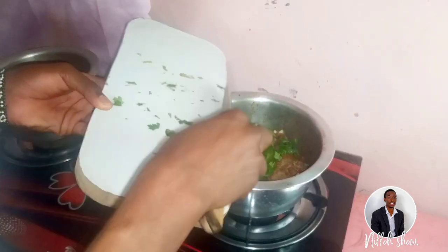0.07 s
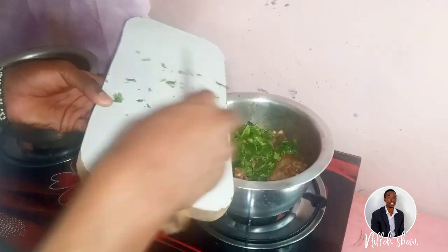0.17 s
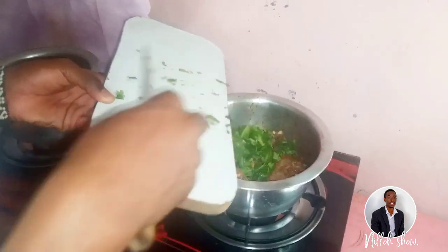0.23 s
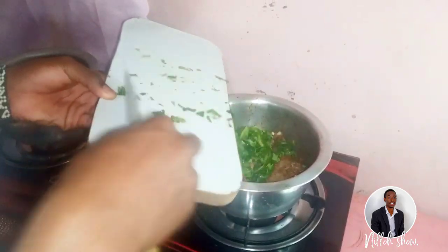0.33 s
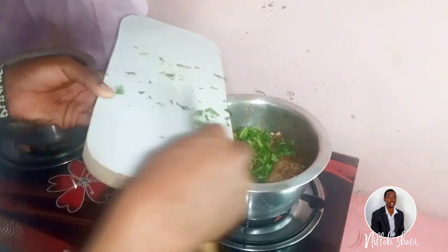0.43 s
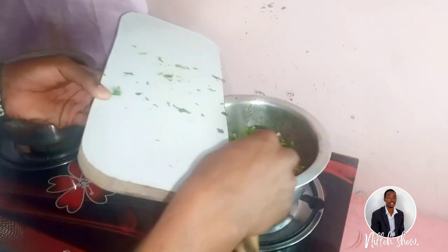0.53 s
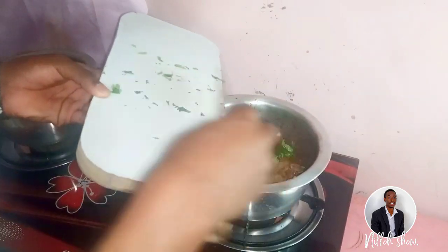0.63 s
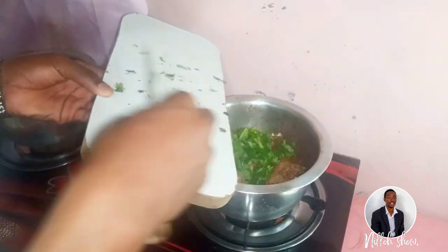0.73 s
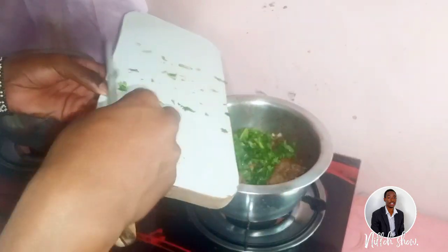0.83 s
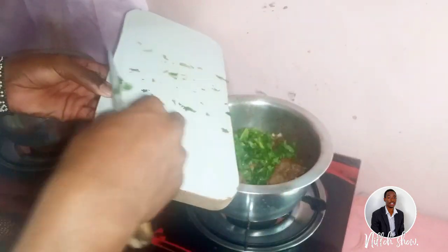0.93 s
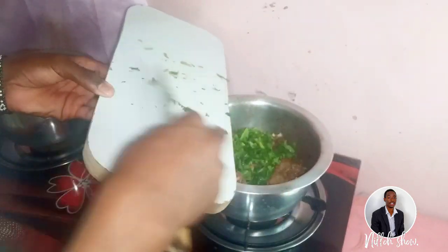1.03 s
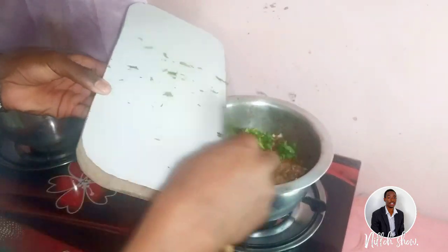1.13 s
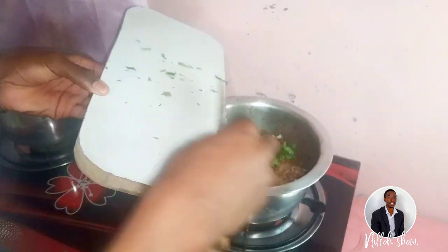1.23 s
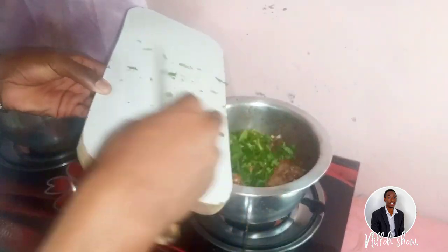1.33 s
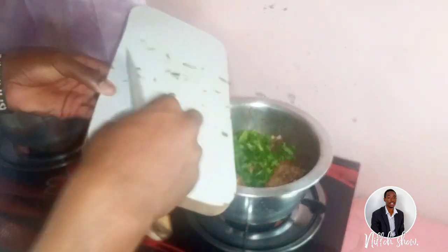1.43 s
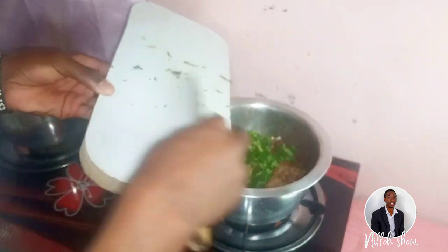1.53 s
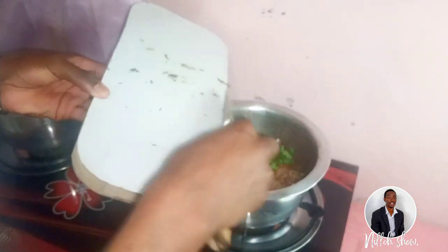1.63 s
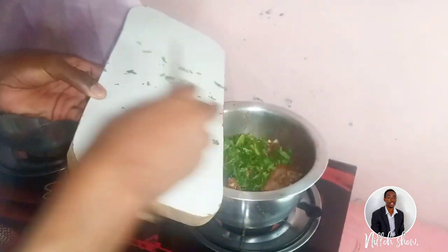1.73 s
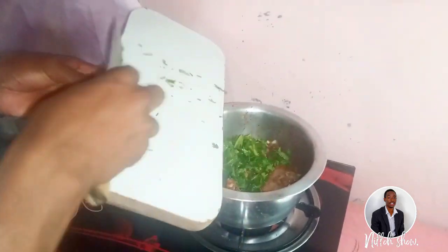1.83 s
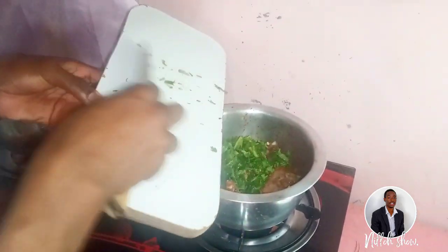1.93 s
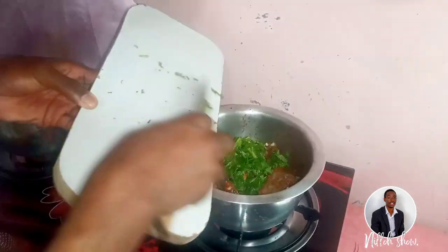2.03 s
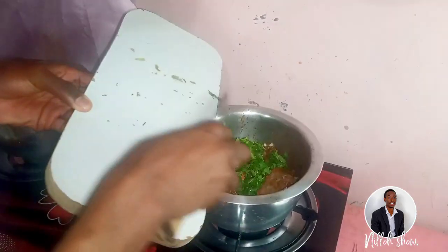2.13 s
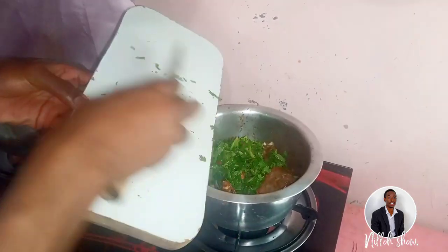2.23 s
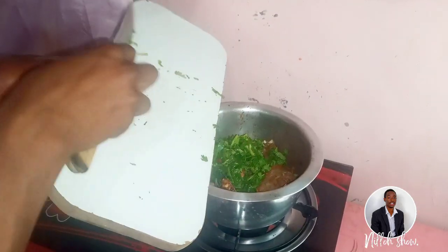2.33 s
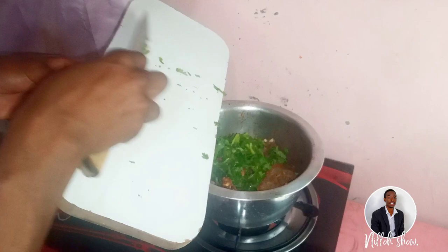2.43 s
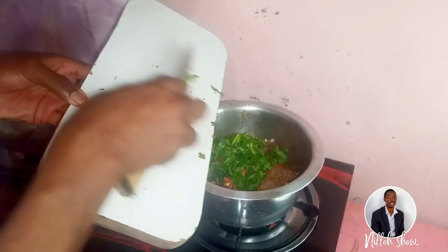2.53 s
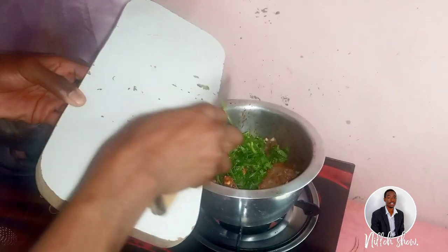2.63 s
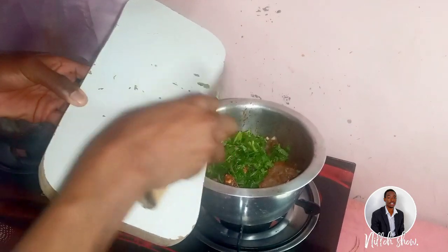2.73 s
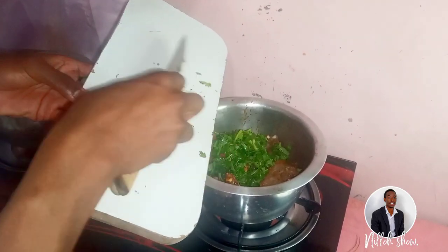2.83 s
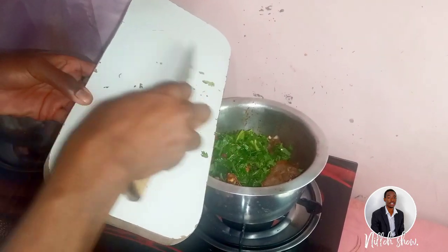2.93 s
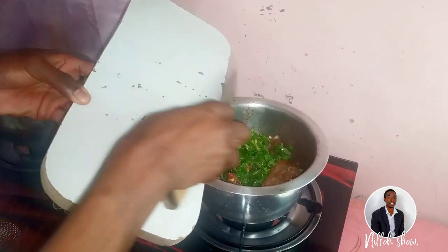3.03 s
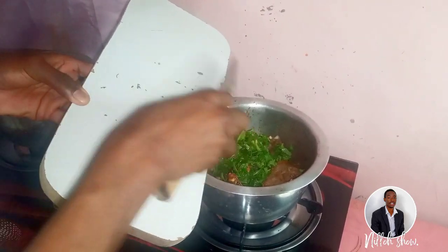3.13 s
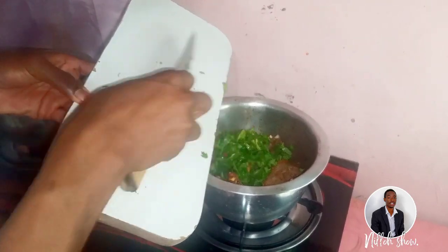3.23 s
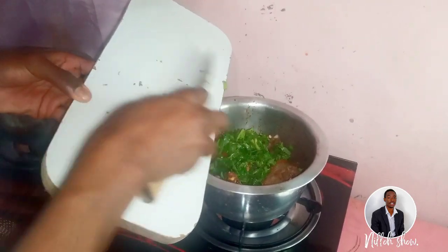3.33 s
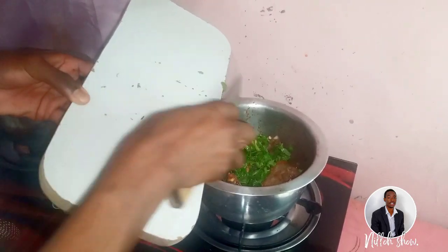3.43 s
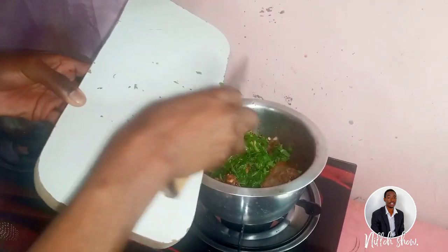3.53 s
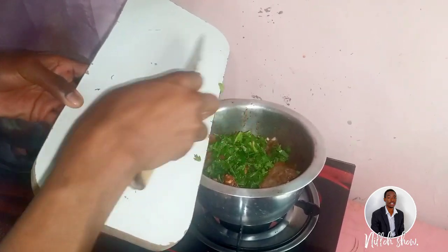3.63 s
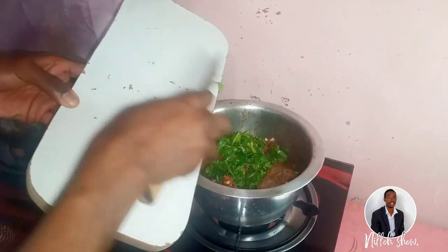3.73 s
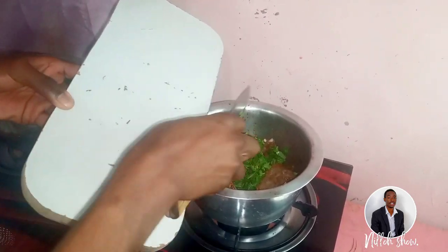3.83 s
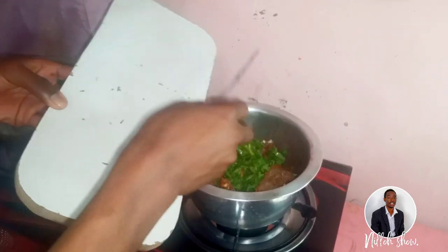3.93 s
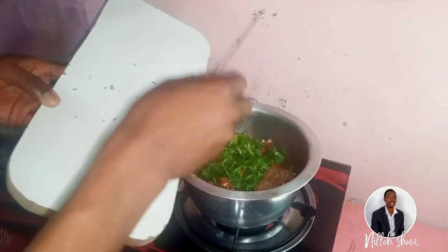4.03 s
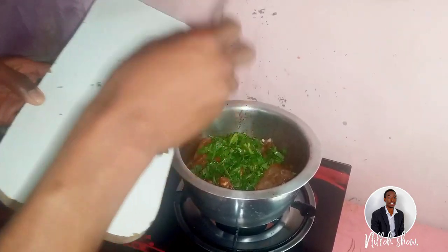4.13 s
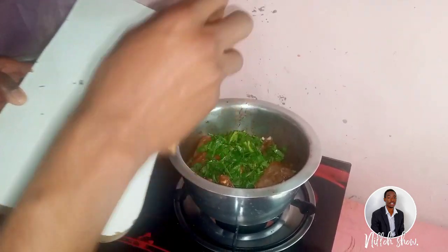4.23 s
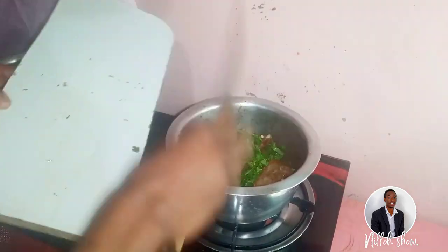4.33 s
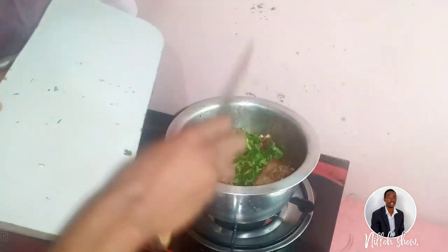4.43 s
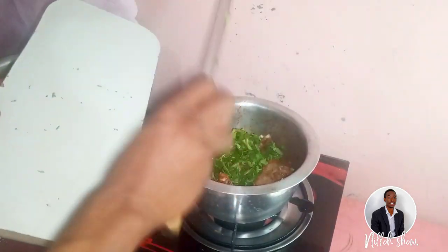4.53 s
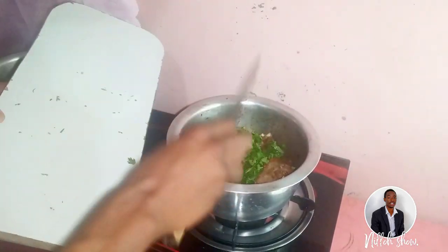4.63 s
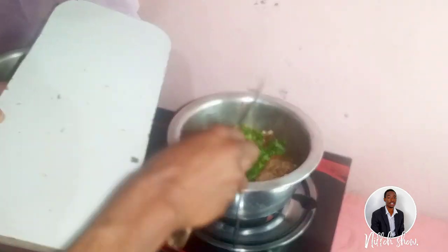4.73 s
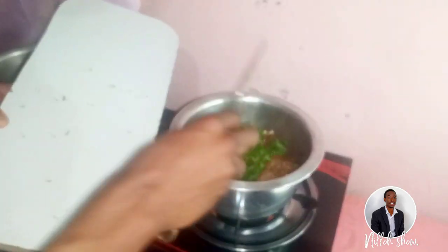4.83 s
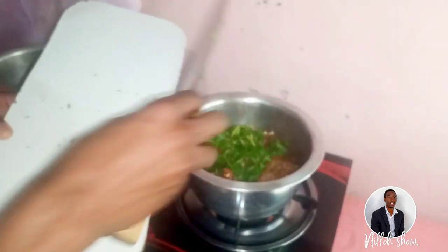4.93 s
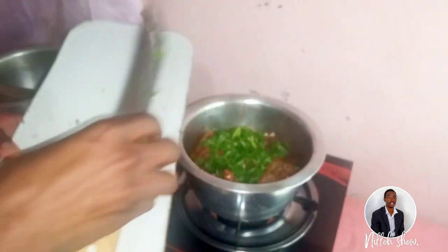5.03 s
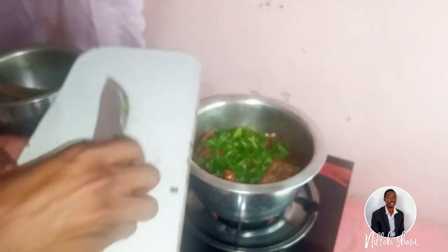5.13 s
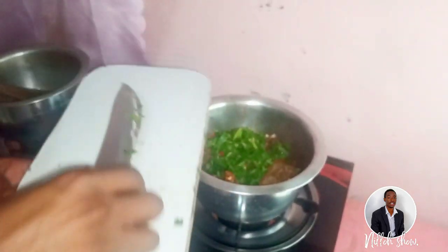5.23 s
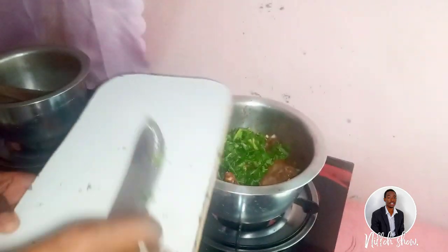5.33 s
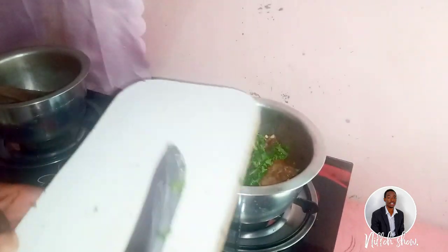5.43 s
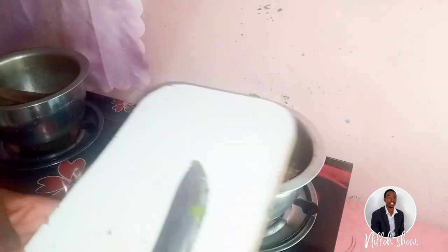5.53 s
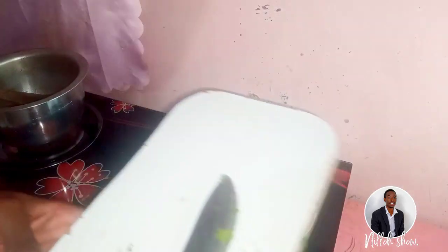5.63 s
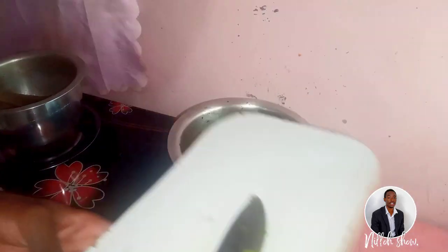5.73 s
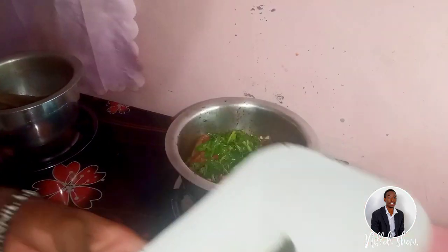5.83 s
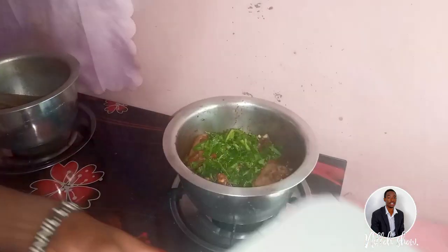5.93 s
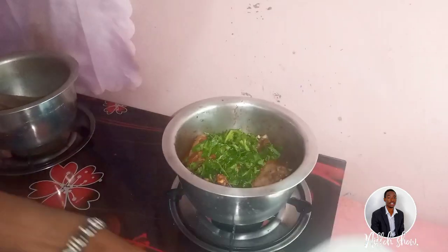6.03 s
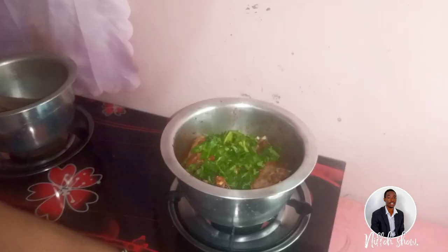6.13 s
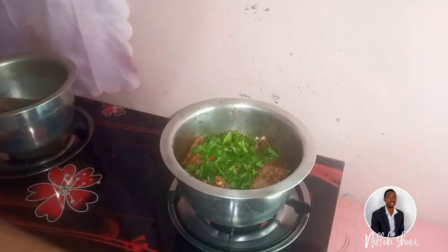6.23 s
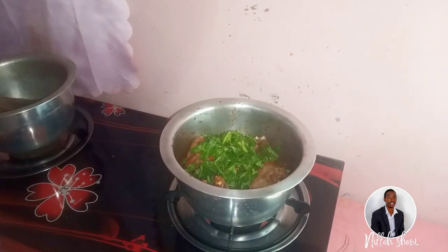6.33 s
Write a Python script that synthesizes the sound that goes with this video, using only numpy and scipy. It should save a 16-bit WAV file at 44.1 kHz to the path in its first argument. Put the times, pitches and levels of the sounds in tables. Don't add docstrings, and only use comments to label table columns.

```python
import sys
import numpy as np
from scipy import signal
from scipy.io import wavfile
from scipy.ndimage import uniform_filter1d

SR = 44100
rng = np.random.default_rng(int(sys.argv[2]) if len(sys.argv) > 2 else 0)


def level_to_linear(level):
    exponent = np.asarray(level, float) / 20
    return 10 ** exponent


def wrap_up_sound(samples):
    columns = np.atleast_2d(samples).T
    tamed = np.clip(columns, -1, 1)
    steps = np.round(tamed * 32767).astype(np.int16)
    wavfile.write(sys.argv[1], SR, steps)


N = 280917

# (pitch [Hz], width [Hz], level [dB])
BENDING = [(809.3, 64.4, -1.5), (894.4, 78, -5.5), (1026, 180, -1.5), (1263, 14, -10)]
MIDDLE = [(1451, 57, 1.5), (1540, 52, -0.5), (1779, 200, -1.5), (1850, 45, 1.5), (2062, 37, -1.5)]
UPPER = [(2311, 123, 4.5), (2678, 51, -1.5), (2936, 137, 4.5), (3542, 82, 2), (3838, 66, 0.5),
         (4345, 230, 1), (4910, 120, -1), (5323, 167, 2), (5560, 55, -18), (5880, 330, -18.5)]
# (pitch [Hz], width [Hz], level [dB])
BLADE = [(9640, 42, -3), (10830, 430, -5.5), (11750, 700, -9)]
# (pitch [Hz], width [Hz], level [dB])
HELD = [(214, 61, 4.2), (321.2, 14, 9), (380.6, 18.2, 1.8), (436, 53, 12.8)]
# (pitch [Hz], level per Hz [dB])
RASP = [(250, -59.5), (620, -41), (760, -6.5), (1300, 1), (1900, -3.5), (3000, -18.5), (5800, 5),
        (6600, -6.5), (7600, -30.5), (9000, -22.5), (10500, -43), (13500, -46), (15000, -8), (16000, -56.5)]


def scrape(slips_per_s=9000, spread_db=2.5, roam_db=2.5, held_db=-35, ragged_db=4.5):
    level, (middle_hz, upper_hz) = contact()
    slips = (rng.random(N) < slips_per_s / SR) * rng.choice([-1., 1.], N)
    slips = slips * level_to_linear(spread_db * rng.exponential(1, N).clip(0, 4))
    slips = evened(slips * level_to_linear(1.0 * wander(hz=55.7)))
    weights = shares(BENDING, 800, 0.88), shares(MIDDLE, middle_hz, 52), shares(UPPER, upper_hz, 3.7)
    board = np.zeros(N)
    for family, gain, weight in zip((BENDING, MIDDLE, UPPER), level, weights):
        for k, (hz, width, _) in enumerate(family):
            drift_db = ragged_db * wander(hz=31.62) if family is UPPER else roam_db * wander(hz=14)
            drive = slips * gain * weight[k] * level_to_linear(drift_db)
            board += (-1) ** k * ring(drive, hz, width) * np.sqrt(4 * np.pi * width / SR)
    blade = np.zeros(N)
    for hz, width, db in BLADE:
        blade += level_to_linear(db + 4.0 * wander(hz=44.0)) * evened(ring(ring(slips, hz, width), hz, 4 * width))
    grit = evened(slips * level_to_linear(2.4 * wander(hz=258.6)))
    rasp = level_to_linear(-9.5) * signal.oaconvolve(grit * level[2], colour(RASP))[:N]
    hz, width, _ = HELD[1]
    held = level_to_linear(held_db) * evened(ring(slips, hz, width)) * level[0]
    return radiated(board) + rasp + blade * level[3] + freed(held)


# (lift time [s], pressure [dB], bending modes [dB], upper modes [dB], blade ring [dB])
STROKES = [
    (0.005, -41.5, -3.5, 3.5, -12),
    (0.573, -41, 2, 2.5, -19),
    (1.188, -39, 0.5, 2, -18),
    (1.643, -35.5, -6.5, 0, -20.5),
    (2.087, -38, -4.5, -1, -22),
    (2.672, -38.5, -3.5, 0, -25.5),
    (3.088, -39, -2, 0, -27),
    (3.45, -41, -1, -2.5, -17.5),
    (3.807, -54, 7.5, 5.5, -14.5),
    (5.57, -59, 5, 3, -9),
]
# (time [s], extra pressure [dB], favoured middle pitch [Hz])
DIGS = [(0.465, 7, 1500), (0.51, 3.5, 1460), (0.557, 5, 2020), (1.03, 1, 1490), (1.08, 11, 1770),
        (1.134, 6, 1740), (1.17, 6.5, 1780), (1.51, 5, 1840), (1.55, 5.5, 1840), (1.59, 4, 1800),
        (1.63, 2.5, 1530), (1.985, 7.5, 1860), (2.02, 12.5, 1850), (2.05, 7.5, 1800), (2.5, 2.5, 1550),
        (2.548, 10.5, 1580), (2.585, 3, 1540), (2.657, 8.5, 1850), (2.985, 3.5, 1460), (3.02, 6, 1540),
        (3.07, -0.5, 1660), (3.383, 5, 1480), (3.435, -2, 1510), (3.774, 7, 1710), (3.787, 14, 1850),
        (5.45, 6, 1850), (5.55, -2, 1850)]
DIG_SHARE = (0.32, 1.0, 0.48, 0.4)
SLOW_LOSS = (0.1, 0.1, 9.2, 20)
SPEED_ARCH = (.8, .8, 0.87, 0.84)


def contact():
    dig_s, grow_s, lifted_s, lift_db_per_s = 0.014, 0.013, 0.11, 1100
    t, level, upper_hz = np.arange(N) / SR, np.zeros((4, N)), np.full(N, 1e3)
    dig_db = sum(db * swell(s, dig_s) for s, db, _ in DIGS)
    starts = [-0.2] + [row[0] for row in LANDINGS]
    for start, (lift, db, low, high, blade) in zip(starts, STROKES):
        on = slice(max(round(start * SR), 0), round((lift + lifted_s) * SR))
        along = np.clip((t[on] - start) / (lift - start), 0, 1)
        grow = np.clip((t[on] - start) / grow_s, 0, 1)
        pressure = grow * level_to_linear(db - lift_db_per_s * np.maximum(t[on] - lift, 0))
        settings = zip((low, 0, high, blade), DIG_SHARE, SLOW_LOSS, SPEED_ARCH)
        for k, (rel, share, loss, arch) in enumerate(settings):
            slow_db = loss * (1 - np.sin(np.pi * arch * along))
            level[k, on] = pressure * level_to_linear(rel + share * dig_db[on] - slow_db)
        upper_hz[on] = 3540 + 480 * along
    places = sorted([(s, hz) for s, _, hz in DIGS] + [(row[0], row[4]) for row in LANDINGS])
    return level, (np.interp(t, *np.transpose(places)), upper_hz)


# (time [s], blow [dB], bending modes [dB], upper modes [dB], favoured middle pitch [Hz])
LANDINGS = [
    (0.3899, -24.5, -1.5, 2, 2060),
    (0.9722, -18, -8, -8.5, 1820),
    (1.4836, -22.5, -14, 3.5, 1877),
    (1.9239, -20, -11.5, -6.5, 1860),
    (2.4343, -16, -11, -6, 1850),
    (2.9598, -20, -10, -12, 1774),
    (3.3476, -25.5, -7, -1, 1830),
    (3.7213, -27.5, -2, -8.5, 1417),
    (5.418, -20.5, -15, -2, 1853),
]
# (pitch [Hz], level per Hz [dB])
KNOCK = [(300, -19), (790, 10.5), (1970, 10), (3130, -13), (5400, -27), (6500, -5), (7440, -39),
         (8300, -29), (11000, -7.5), (13000, -15.5), (15000, -7), (16500, -37)]


def landings(crack_db=-3, focus_db=110, touch_db=-24):
    damping = 1.2
    rebound_s, rebound_db = 0.006, -22
    place_db = 2.2
    s, db, low, high, favoured_hz = np.transpose(LANDINGS)
    chatter = np.exp(-np.arange(500) / 130) * rng.standard_normal(500) * 0.34
    chatter[0] = 1
    shake = rng.standard_normal(N)
    board = np.zeros(N)
    for family, rel, trim_db in ((BENDING, low, -3.5), (MIDDLE, 0, 0.1), (UPPER, high, -11)):
        for k, (hz, width, mode_db) in enumerate(family):
            away_db = -focus_db * abs(np.log(hz / favoured_hz)) * (family is MIDDLE)
            chance_db = place_db * rng.standard_normal(len(s))
            blow = impulses(s, db + rel + trim_db + mode_db + away_db + chance_db)
            rebounds = shake * signal.lfilter([level_to_linear(rebound_db)], [1, -np.exp(-1 / SR / rebound_s)], blow)
            board += ring((-1) ** k * blow + rebounds, hz, width * damping)
    crack = signal.oaconvolve(impulses(s, db + high + crack_db), np.convolve(chatter, colour(KNOCK)))[:N]
    hz, width, _ = BENDING[0]
    touch = ring(impulses(s - .0042, db + touch_db), hz, width)
    u = np.arange(4000) / 600
    thump = impulses(s, -52 - 0.27 * low - 27.0)
    push = shake * signal.oaconvolve(thump, u * np.exp(-u))[:N]
    thud = sum((-1) ** k * level_to_linear(d) * ring(push, hz, width) for k, (hz, width, d) in enumerate(HELD))
    return radiated(board + touch) + crack + freed(thud)


# (time [s], blow [dB], favoured low pitch [Hz], brightness [dB])
BUMPS = [
    (3.813, -28, 444, -4),
    (3.845, -43, 409, -10),
    (3.889, -63, 310, -6),
    (5.416, -28, 433, -18),
    (5.447, -37, 439, -5.5),
    (5.484, -49, 304, -8),
    (5.514, -34, 452, -7),
    (5.545, -39.5, 420, 10.5),
    (5.599, -56, 315, -5),
]
# (pitch [Hz], width [Hz], level [dB])
RATTLE = [(594, 270, -10.5), (706, 80, -9), (814, 12, -6.5), (830, 30, -11)]


def bumps():
    out, t = np.zeros(N), np.arange(8000) / SR
    for s, db, favoured_hz, bright_db in BUMPS:
        blow = np.exp(-t / 0.0033) * rng.standard_normal(len(t)) / 12
        blow[0] += 1.1
        weight = shares(HELD, favoured_hz, 30)
        low = sum((-1) ** k * weight[k] * ring(blow, hz, 1.13 * width) for k, (hz, width, _) in enumerate(HELD))
        high = sum(level_to_linear(d + bright_db - 6.0) * ring(blow, hz, width) for hz, width, d in RATTLE)
        part = out[round(s * SR):][:len(t)]
        part += level_to_linear(db) * freed(low + high) / abs(low).max()
    return out


# (pitch [Hz], level [dB])
RADIATION = [(100, -50.5), (450, -39.5), (640, -21.5), (750, -2.5), (6200, -6), (7200, -11.5), (8200, -28),
             (11000, -22), (15000, -9.5)]


def radiated(x):
    return level_to_linear(-5.5) * signal.oaconvolve(x, colour(RADIATION))[:N]


def freed(x):
    return signal.sosfilt(signal.butter(2, [170, 1100], "bandpass", fs=SR, output="sos"), x)


# (time [s], peak level [dB], pitch [Hz])
SPITS = [(0.1733, -46, 3040), (0.1968, -44, 4140), (0.713, -46, 3540), (1.4464, -42, 5250),
         (2.344, -37, 4540), (2.9104, -41, 3650), (3.6824, -43, 4300), (3.969, -37.5, 4170),
         (4.125, -38, 4360), (4.295, -32, 5130), (4.3628, -39, 4340), (4.591, -39, 4340),
         (4.6995, -43, 4700), (4.799, -38.5, 4400), (4.852, -38, 4900), (4.888, -34.5, 4320),
         (5.0746, -44, 5360), (5.3546, -40, 4200), (5.9331, -33, 4370), (5.973, -38, 4070),
         (6.1048, -38, 4840), (6.264, -38, 4100)]
# (time [s], peak level [dB], pitch [Hz])
DRIPS = [
    (0.072, -47, 3000),
    (1.3636, -42.5, 2970),
    (1.7614, -43, 3650),
    (2.789, -36, 3570),
    (3.7417, -37, 1680),
    (4.9188, -41.5, 1540),
]


def spits():
    out, t = np.zeros(N), np.arange(2600) / SR
    rows = [(*r, 0.015, 10.5) for r in SPITS] + [(*r, 0.05, 0.1) for r in DRIPS]
    crackle = rng.standard_normal((len(rows), 200)) * np.exp(-np.arange(200) / 30) / 4
    for (s, db, hz, t60, tick_db), burst in zip(rows, crackle):
        bubble = level_to_linear(-60 * t / t60) * np.sin(2 * np.pi * hz * t) * np.clip(t / 0.00023, 0, 1)
        bubble[:2247] += level_to_linear(tick_db) * np.convolve(burst, colour(SIMMER))
        part = out[round(s * SR):][:len(t)]
        part += level_to_linear(db - 9.0) * bubble[:len(part)]
    return out


# (pitch [Hz], level per Hz [dB])
SIMMER = [(60, -38.5), (189, -8.5), (540, -12.5), (1210, -11), (1550, -1.5), (2210, -5.5), (2910, -12),
          (4930, -0.5), (6050, -6), (8040, -31), (8790, -31), (10800, -19), (13400, -19.5), (14900, -11.5)]
# (time [s], level [dB])
SIMMER_LEVEL = [
    (0.0, -63),
    (1.5, -64),
    (3.0, -63),
    (3.9, -61),
    (5.4, -59.5),
    (6.37, -60),
]


def simmer(patchy_db=1.75, flicker_db=2.0, fizz_per_s=330, fizz_db=-10.5):
    frames, hz = N // 128 + 5, np.fft.rfftfreq(512, 1 / SR)
    a, b, patches = rng.standard_normal((frames, 257, 3)).T
    patches = evened(uniform_filter1d(uniform_filter1d(patches, size=8, axis=0), size=16, axis=1))
    flicker = evened(uniform_filter1d(rng.standard_normal(frames), size=3)) * (hz[:, None] > 1200)
    spectrum = (a + 1j * b) * level_to_linear(patchy_db * patches + flicker_db * flicker)
    hiss = signal.istft(spectrum, nperseg=512, noverlap=384)[1][:N]
    fizz = (rng.random(N) < fizz_per_s / SR) * level_to_linear(1.6 * rng.exponential(1, N).clip(0, 3))
    fizz = signal.lfilter([1], [1, -.82], fizz) * rng.standard_normal(N)
    pot = evened(signal.oaconvolve(evened(hiss) + level_to_linear(fizz_db) * evened(fizz), colour(SIMMER))[:N])
    return pot * level_to_linear(np.interp(np.arange(N) / SR, *np.transpose(SIMMER_LEVEL)) + 1.5)


# (pitch [Hz], time to fade by 60 dB [s])
KITCHEN = [(250, 0.34), (800, 0.34), (2000, 0.23), (5000, 0.24), (12000, 0.31)]


def kitchen(x):
    taps = np.zeros(SR // 2)
    at = np.arange(200, SR // 2 - 20, 20)
    taps[at + rng.integers(0, 20, len(at))] = rng.choice([-1., 1.], len(at))
    hz, t, z = signal.stft(taps, SR, nperseg=256)
    tail = signal.istft(z * level_to_linear(-60 * t / read(KITCHEN, hz)[:, None]), SR, nperseg=256)[1]
    return signal.fftconvolve(x, tail / np.linalg.norm(tail))[:N]


def gated(x):
    gate_db, soft_db = -63.5, 2.5
    level_db = 10 * np.log10(abs(uniform_filter1d(x ** 2, size=1200)) + 1e-12)
    return x * (1 + np.tanh((level_db - gate_db) / soft_db)) / 2


# (time [s], level [dB], length [s])
JOLTS = [(0.0, -57, 0.019), (0.76, -83, 0.17), (1.155, -83, 0.11), (1.5, -84, 0.054), (1.95, -73, .04),
         (2.466, -72, 0.038), (2.993, -77, 0.087), (3.36, -62, 0.02), (3.533, -75, 0.037),
         (3.82, -76, 0.043), (4.31, -81, 0.036), (5.43, -79, 0.035), (5.6, -63.5, 0.054),
         (5.92, -70, 0.067)]


def rumble():
    low = signal.sosfilt(signal.butter(3, [70, 190], "bandpass", fs=SR, output="sos"), rng.standard_normal(N))
    low = evened(low) + 1.1 * evened(ring(low, 120.5, 7.5))
    level = level_to_linear(-80.5 + 2 * wander(hz=6))
    level = level + sum(level_to_linear(db) * swell(s, length) for s, db, length in JOLTS)
    return evened(low) * level * level_to_linear(-7.5)


def evened(x):
    return x / np.sqrt(np.mean(x ** 2) + 1e-20)


def read(points, hz):
    f, value = np.transpose(points)
    return np.interp(np.log(hz + 1), np.log(f + 1), value)


def wander(hz):
    knots = np.arange(int(N / SR * hz) + 2)
    return np.interp(np.arange(N) / SR * hz, knots, rng.standard_normal(len(knots)))


def swell(s, width_s):
    return np.exp(-((np.arange(N) / SR - s) / width_s) ** 2)


def impulses(times, db):
    x = np.zeros(N)
    x[(np.asarray(times) * SR).astype(int)] = level_to_linear(db)
    return x


def ring(x, hz, width):
    r, w = np.exp(-np.pi * width / SR), 2 * np.pi * hz / SR
    return signal.lfilter([0, np.sin(w)], [1, -2 * r * np.cos(w), r * r], x)


def shares(family, favoured_hz, focus_db):
    gain = np.array([level_to_linear(db - focus_db * abs(np.log(hz / favoured_hz))) for hz, _, db in family])
    return gain / np.sqrt((gain ** 2).sum(axis=0))


def colour(points):
    log_gain = np.log(level_to_linear(np.maximum(read(points, abs(np.fft.fftfreq(4096, 1 / SR))), -100)))
    h = np.fft.ifft(np.exp(np.conj(signal.hilbert(log_gain)))).real[:2048]
    return h / np.linalg.norm(h)


def scene():
    board = scrape() + landings() + bumps()
    echo = gated(level_to_linear(-8.0) * kitchen(board))
    return (level_to_linear(-0.5) * board + echo + simmer() + spits() + rumble())[None]


def top_cut(x):
    return signal.sosfilt(signal.butter(12, 16790, fs=SR, output="sos"), x)


def record(dry):
    low_pass = signal.firwin(401, 15800, window=("kaiser", 6), fs=SR)
    limited = signal.oaconvolve(dry, low_pass[None], "same")
    return top_cut(limited)


dry = scene()
out = record(dry)
wrap_up_sound(out)
```